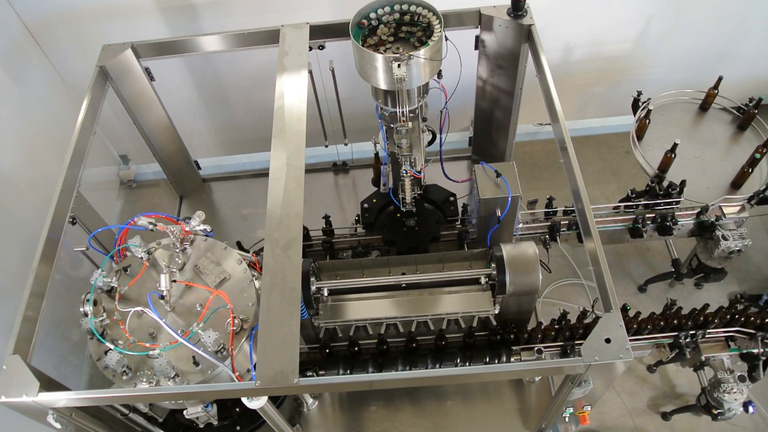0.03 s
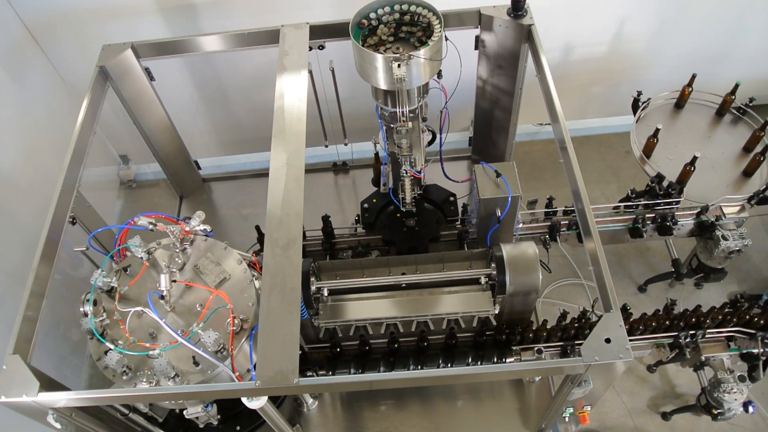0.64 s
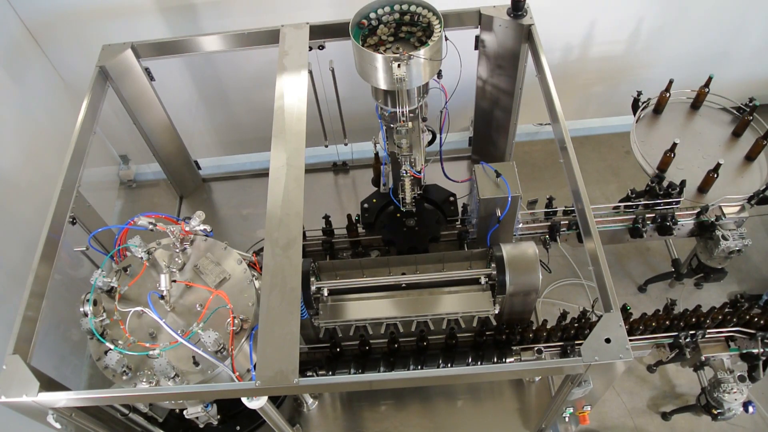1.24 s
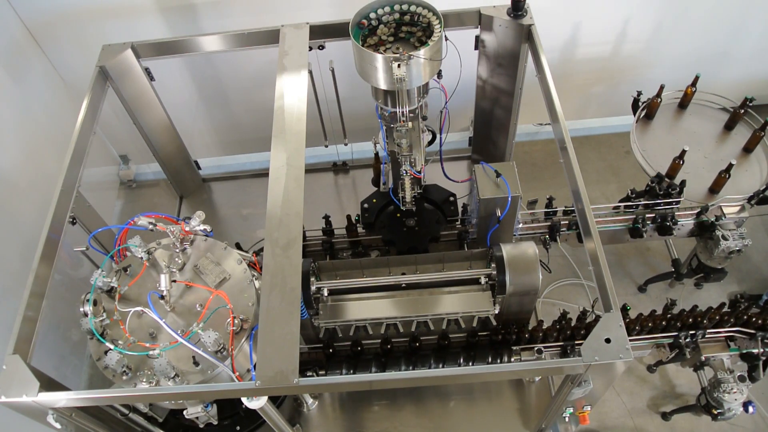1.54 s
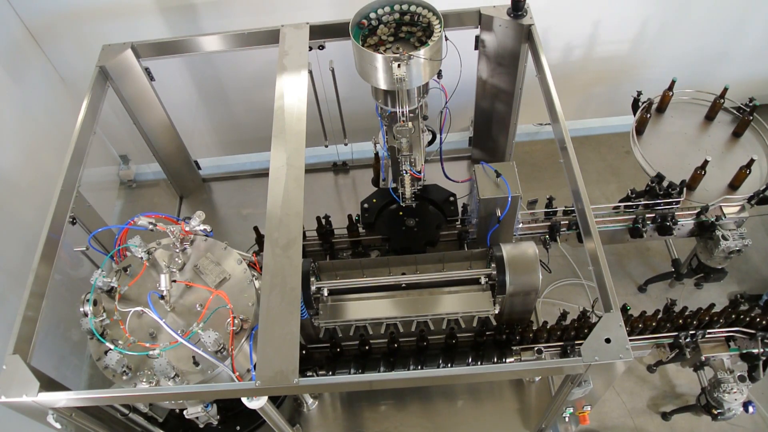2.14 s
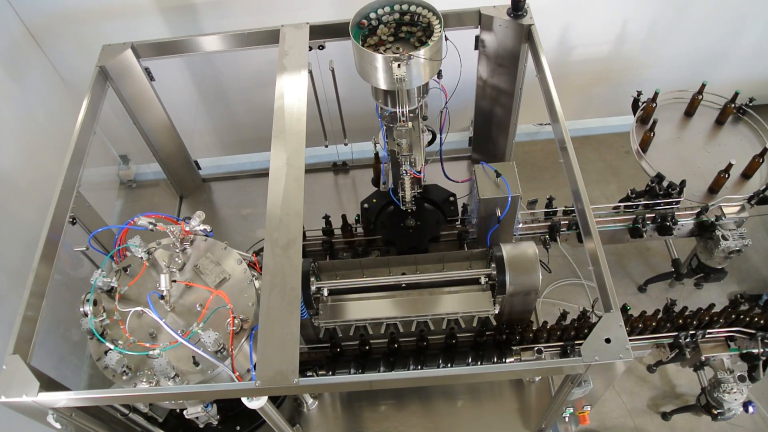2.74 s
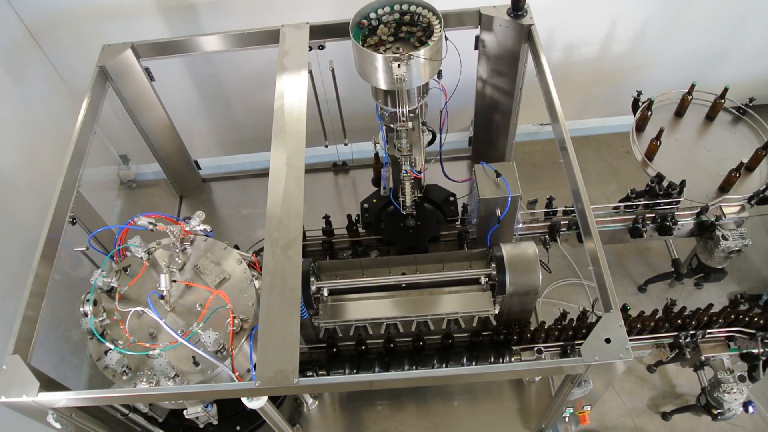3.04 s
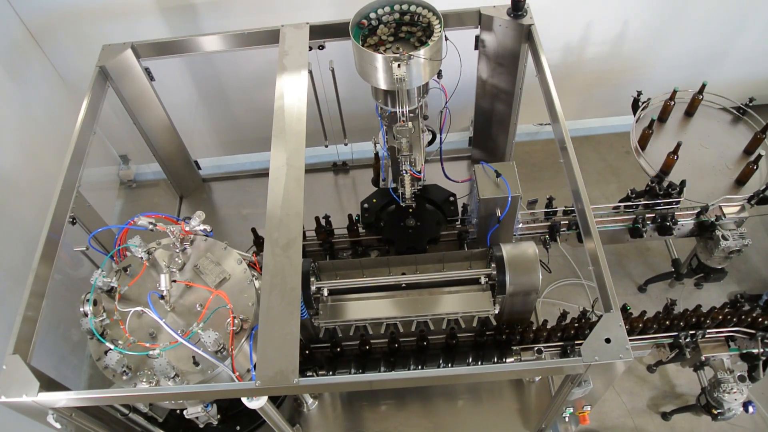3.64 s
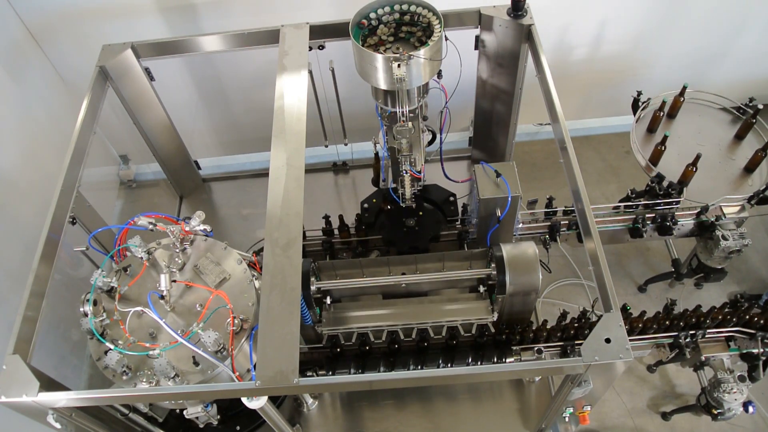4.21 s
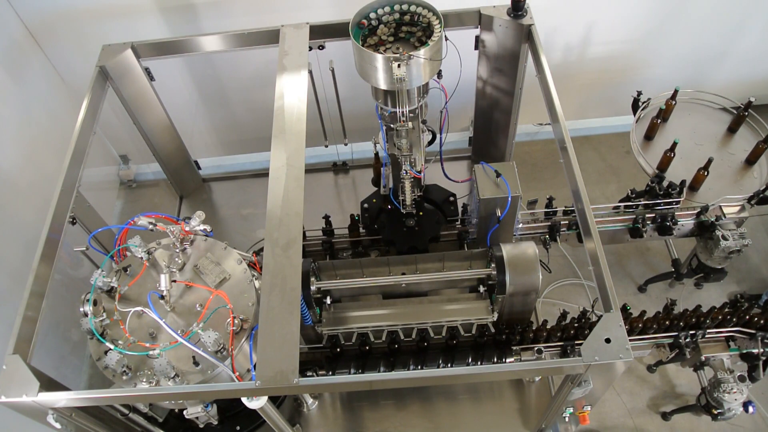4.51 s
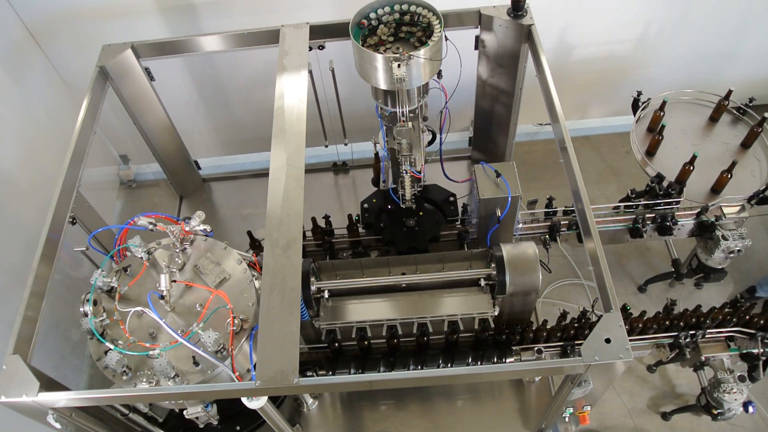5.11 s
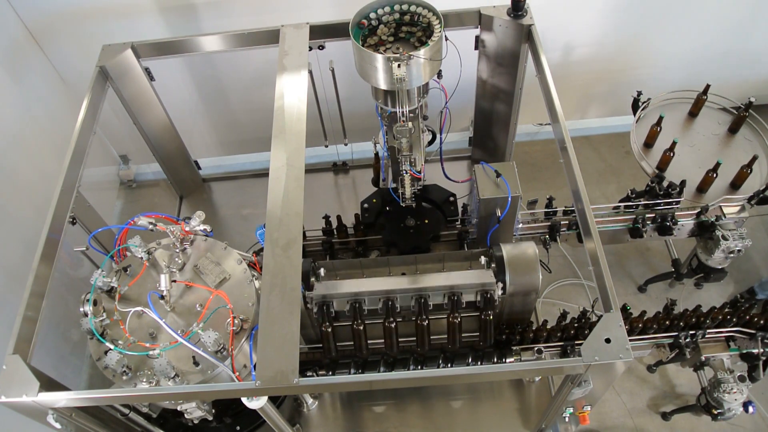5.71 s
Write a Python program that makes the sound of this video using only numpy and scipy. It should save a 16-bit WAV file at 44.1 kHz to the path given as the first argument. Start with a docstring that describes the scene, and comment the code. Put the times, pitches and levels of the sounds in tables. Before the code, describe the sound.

In a small, hard-walled factory room, a bottling line runs mostly to the right of the microphone. Its gears and chain drone and whirr, swelling now and then, while crowded glass bottles chatter against each other. Air cylinders let out two sharp blasts, well apart. Then ticks and short metallic pings gather, the steel frame knocks, water jets hiss, and a third air blast follows near the end.

```python
"""Empty glass bottles jostle and clink on a conveyor, over the roar, whirr and hum of its drive.
Valves tick, single notes ring out, the carousel scrapes its guide and knocks sound the steel frame.
Air cylinders vent three times and rinser jets open late on; a gain control ducks under the hiss.
The bottling line sits mostly on the right, in a small factory room with hard walls."""
import sys
import numpy as np
from scipy import signal
from scipy.fft import rfft, irfft
from scipy.io import wavfile
from scipy.ndimage import uniform_filter1d

SR = 44100
rng = np.random.default_rng(int(sys.argv[2]) if len(sys.argv) > 2 else 0)


def wav_out(sig):
    """Save sig, one row per channel (or a flat mono array), as 16-bit PCM at SR to the path in sys.argv[1]."""
    wavfile.write(sys.argv[1], SR, np.round(np.clip(np.atleast_2d(sig).T, -1, 1) * 32767).astype(np.int16))


N = 262836
TIME = np.arange(N) / SR
BINS = np.fft.rfftfreq(N, 1 / SR)

# Bottle wall modes (one low ring, two high, then the top): pitch_hz, level_db, t60_s, pitch_spread_share
GLASS_MODES = [(2667, 0, 0.11, .015), (3015, 0, 0.071, 0.026), (4452, -12.5, 0.057, 0.015),
               (4590, -1.5, 0.072, 0.0252), (6207, -1.5, 0.038, 0.019), (6495, -0.5, 0.059, 0.0074),
               (7385, -3.5, 0.089, 0.011), (7844, -1.5, 0.047, 0.018), (9795, -3.5, 0.041, 0.0067),
               (11280, -11, 0.053, 0.014), (11970, -5, 0.019, 0.053), (14370, -6, .012, .035)]
# The queue pressing together: start_s, end_s, level_db, high_over_low_db, hardness_db
QUEUE_PRESSES = [(0.0, 0.39, -45.5, 8, -9), (0.51, 0.754, -46.5, 3, -15.5), (0.93, 1.2, -47, -5, -16),
                 (1.245, 1.47, -50.5, -1, -3), (1.473, 2.096, -43.5, 2, -10.5), (2.15, 2.376, -53, 3, -7.5),
                 (2.622, 2.75, -47.5, -3.5, -10.5), (2.988, 3.302, -44.5, -0.5, -8),
                 (3.445, 3.82, -44.5, 3.5, -11.5), (4.63, 4.883, -60.5, 10, 2),
                 (5.006, 5.222, -51.5, -1, -7), (5.416, 5.56, -45, 10, -9)]
# Bottles shoved hard together: middle_s, length_s, ring_db, high_over_low_db, contact_db
SHOVES = [(-0.001, 0.057, -38, 0, -49.5), (0.096, 0.059, -39, 1, -51.5), (0.233, 0.064, -39, -0.5, -55.5),
          (0.331, 0.036, -40.5, 3, -46.5), (.44, 0.033, -42, 16, -53), (0.588, 0.034, -39, 3, -47.5),
          (0.665, .018, -47, 5, -47.5), (0.727, .019, -64, 0, -50.5), (1.2, .025, -39, -12, -63),
          (1.438, 0.065, -39.5, -1.5, -51.5), (1.577, .045, -39.5, 5, -47.5), (1.63, 0.05, -40.5, -17, -53),
          (1.676, 0.036, -39, 22, -46), (1.77, 0.069, -44.5, 10, -85), (1.901, 0.037, -40.5, -9, -52),
          (2.03, 0.032, -43, 7, -50), (2.306, 0.074, -38.5, 7, -51), (3.013, 0.014, -43, -5, -63),
          (3.063, 0.053, -40, -15, -56), (3.171, 0.039, -42, 3, -49), (3.293, 0.1, -40.5, 15, -53.5),
          (3.588, 0.063, -45, 0, -49), (3.68, 0.061, -45, -9, -57), (3.887, .035, -36.5, 8, -52.5),
          (3.981, 0.054, -39, 4.5, -50.5), (4.755, 0.025, -47, -7, -66), (4.879, .025, -42.5, -2, -55),
          (4.982, 0.02, -42, 5, -51.5), (5.07, 0.023, -50, -2, -55), (5.141, 0.012, -35, 1.5, -50),
          (5.159, 0.018, -51, 8, -43), (5.948, 0.035, -54, 17, -68)]
# Dry rub of glass on glass: frequency_hz, level_db
RUB_SPECTRUM = [(1000, -43), (3500, -19), (5500, 0), (7500, 3), (9000, -2), (12000, 2), (16000, -26)]
# Roar of the gears: frequency_hz, level_db
GEAR_SPECTRUM = [(20, -60), (35, -50), (52, -44), (72, -22), (120, -19.5), (150, -12), (200, -15.5),
                 (260, -5.5), (480, -4), (700, 0), (960, -0.5), (1200, -8.5), (2400, -33), (8000, -41)]
# Whirr of the chain: frequency_hz, level_db
CHAIN_SPECTRUM = [(20, -70), (100, -46), (300, -20), (900, -5), (1300, 2.5), (2350, 3.5), (3300, 0),
                  (3900, -4.5), (5000, -2), (8000, -16.5), (9000, -10.5), (13000, -18.5), (16000, -30)]
# Panel resonances that colour gears and chain: centre_hz, width_hz, lift_db
PANEL_PEAKS = [(487, 73, 5.5), (582, 3.6, 6.5), (940, 25, 1), (1020, 9.2, 3.5), (1529, 7.3, 10),
               (1983, 20, 5), (2480, 30, -4)]
# Motor hum: pitch_hz, level_db
HUM_TONES = [(100, -1.5), (75, -14.5), (150.3, -13.5)]
# Thin whine of the drive: pitch_hz, level_db
WHINE_TONES = [(7945, -76), (8150, -71), (11800, -78)]
# Strokes that load the drive: start_s, end_s, roar_lift_db, hum_lift_db
LOAD_STROKES = [(0.213, .3, 1.5, -1), (1.145, 1.517, 5.5, 7), (2.205, 2.38, 1.5, 1.5),
                (2.93, 3.183, 3, 0.5), (3.75, 3.98, 0.5, 1.5), (4.744, 5.156, 6, 2.5), (5.4, 5.547, 7, 7)]
# The chain running slack: start_s, end_s, change_db
SLACK_SPELLS = [(0, .02, -3), (.44, 0.658, -1), (2.77, 2.936, -3), (3.37, 3.422, -3), (4.35, 4.484, -7.5),
                (5.246, 5.373, 0), (5.75, 5.96, -4.5)]
# Valve ticks and sharp taps: start_s, level_db, t60_s
VALVE_TICKS = [(.782, -46.5, 0.06), (0.952, -52, 0.08), (1.123, -49, 0.1), (1.296, -47, 0.11),
               (2.320, -51, 0.064), (3.003, -51.5, 0.069), (3.858, -47, 0.066), (4.378, -56, .08),
               (4.541, -46.5, 0.13), (4.619, -55, 0.1), (4.882, -52, 0.099), (5.052, -51, 0.14),
               (5.120, -50, 0.11)]
# Colour of a tick: frequency_hz, level_db
TICK_SPECTRUM = [(800, -35), (3500, -1.5), (4700, 2), (5250, 8.5), (5900, -5), (8000, -0.5), (12500, -4),
                 (16000, -11)]
# Short rings, and one faint, thin, high tone that fades slowly: start_s, pitch_hz, level_db, t60_s
RINGING_NOTES = [(1.03, 1003, -50, 0.6), (1.25, 10700, -61, 3.9), (3.57, 4030, -48, 0.52),
                 (3.595, 3620, -46, 0.36), (4.541, 5110, -54, 0.053), (4.62, 4800, -48, 0.11),
                 (4.705, 4900, -47, 0.13), (4.795, 4900, -51, 0.14), (4.885, 3420, -41, 0.07),
                 (5.055, 3470, -41, 0.06), (5.12, 4800, -45, 0.059), (5.146, 10300, -42, 0.12),
                 (5.15, 3680, -42, 0.24), (5.455, 4960, -30, 0.067), (5.64, 3720, -48, 0.21)]
# The carousel touching its guide: middle_s, length_s, peak_pitch_hz, level_db
GUIDE_SCRAPES = [(1.3, .08, 740, -55), (1.403, .12, 954, -46.5), (2.981, .12, 840, -50.5),
                 (3.16, .1, 739, -54.5), (4.93, 0.17, 732, -55), (5.118, .11, 860, -51.5)]
# Dull knocks on the frame: start_s, level_db, pitch_ratio
FRAME_KNOCKS = [(1.372, -69, 1.3), (2.976, -53, 0.96), (4.813, -39, 1.0)]
# Modes of the steel frame: pitch_hz, level_db, t60_s
FRAME_MODES = [(462, 5.5, 0.1), (780, -6, .2), (834, -20, .15), (996, -10, 0.13), (1610, -7, 0.23),
               (1960, -22, 0.28)]
# Cylinders venting: start_s, end_s, level_db
VENT_BLASTS = [(2.366, 2.536, -28.5), (3.991, 4.15, -28.5), (5.604, 5.763, -30.5)]
# Hiss of the exhaust air: frequency_hz, level_db
VENT_SPECTRUM = [(400, -48), (1400, -21), (2300, -5.5), (5000, -2.5), (6200, -3), (6900, 1.5), (8200, -1.5),
                 (9800, 1), (11200, 2.5), (13000, 2.5), (14200, -0.5), (16000, -1)]
# Rinser jets: start_s, full_flow_end_s, level_db
JET_BURSTS = [(4.533, 4.73, -51), (5.171, 5.5, -33.5)]
# Hiss of the spray: frequency_hz, level_db
JET_SPECTRUM = [(600, -12.5), (2000, -10), (5000, -5), (8000, -3), (10000, 1.5), (12000, 3), (16000, 1.5)]
# Decay of the room: frequency_hz, t60_s
ROOM_DECAY = [(200, 0.24), (2500, 1), (7000, 0.8), (11000, 0.47), (16000, 0.5)]
# How alike left and right sound: frequency_hz, likeness_ratio (held to 0..1 in the mix)
STEREO_LIKENESS = [(60, 1.4), (640, 0.5), (1400, .8), (3100, 0.17), (6800, 0.01), (15000, -0.17)]
# The weaker left side: frequency_hz, left_over_right_db
LEFT_BALANCE = [(100, -13.5), (400, -13.5), (1300, -14), (2700, -15), (4400, -14), (8100, -13.5),
                (12000, -14.5), (15000, -24)]


def bottles(high_db=-1.5, top_db=1.5, rub_db=-2.5):
    """Glass rings swell as the bottles crowd; hard contacts rub and wake the top modes."""
    low, high, top = glass_rings()
    low_power, high_power, top_power, contact_power = jostle()
    glass = np.sqrt(low_power) * stray(low) + amp(high_db) * np.sqrt(high_power) * stray(high)
    glass += np.sqrt(amp(2 * top_db) * top_power + contact_power) * top
    return glass + np.sqrt(contact_power) * amp(rub_db) * noise(curve(RUB_SPECTRUM, BINS))


def glass_rings(count=14, taps_per_s=550, spread_db=1.0, clump_db=3.5, swell_db=1.1):
    """Bottles of slightly different size tap in clumps, making beds of low, high and top modes."""
    t = np.arange(5000) / SR
    hz, db, t60, spread = np.transpose(GLASS_MODES)[:, :, None]
    clumps = amp(clump_db * wander(16))
    rings = np.zeros((3, 2, N))
    for size in np.linspace(-1, 1, count):
        at = rng.integers(0, N, round(taps_per_s * N / SR / count))
        force = clumps[at] * amp(spread_db * np.minimum(rng.exponential(1, len(at)), 4))
        taps = force * rng.choice([-1, 1], len(at))
        pitch = hz * (1 + spread * (size + rng.standard_normal(hz.shape) / count))
        phase = 2 * np.pi * (pitch * t + rng.random((2, len(hz), 1)))
        modes = amp(db - 60 * t / t60) / np.sqrt(t60) * np.sin(phase)
        groups = np.array([modes[:, 0], modes[:, 1:3].sum(1), modes[:, 3:].sum(1)])
        for start, tap in zip(TIME[at], taps):
            add(rings, start, tap * groups)
    slow_level = np.sqrt(abs(uniform_filter1d(rings ** 2, 1500)) + 1e-12)
    swell = amp(swell_db * np.array([[wander(20)] for _ in rings]))
    return rings / slow_level * swell  # evened out, with the fast grain kept


def jostle(idle_db=(-58, -59, -66.5), slack_share=0.8, pack_s=0.015, loosen_s=0.041):
    """Power of low, high and top modes and of hard contacts as bottles ride loose, press and shove."""
    riding_db, contact = slack_share * chain_slack(), 0
    low, high, top = (amp(2 * (db + riding_db)) for db in idle_db)
    for start, end, db, tilt_db, hardness_db in QUEUE_PRESSES:
        power, tilt = amp(2 * db) * spell(start, end, pack_s, loosen_s), amp(2 * tilt_db)
        low += power / (1 + tilt)
        high += power * tilt / (1 + tilt)
        top += power * amp(2 * hardness_db)
    for middle, length, db, tilt_db, contact_db in SHOVES:
        shove, tilt = bump(middle, length), amp(2 * tilt_db)
        power = amp(2 * db) / (1 + tilt) * shove
        low += power
        high += power * tilt
        contact += amp(2 * contact_db) * shove
    return low, high, top, contact


def stray(ring, pitch_share=0.008, rate_hz=18.04):
    """The ring drifts in pitch as other bottles take the knocks."""
    warped = TIME + np.cumsum(pitch_share * wander(rate_hz)) / SR
    return np.array([np.interp(warped % TIME[-1], TIME, channel) for channel in ring])


def drive(gear_db=-55, chain_db=-50, hum_db=-77, load_s=0.12, relief_s=0.11, lead_s=0.14):
    """Gears roar and the chain whirrs through panels, swelling with each stroke; the motor hums."""
    load_db = strain_db = 0
    for start, end, roar_lift, hum_lift in LOAD_STROKES:
        load_db += roar_lift * spell(start, end, load_s, relief_s)
        strain_db += hum_lift * spell(start - lead_s, end - lead_s, load_s, relief_s)  # motor goes first
    slack_db, flutter_db = chain_slack(), 1.24 * wander(16)
    panels_db = sum(lift / (1 + (2 * (BINS - hz) / width) ** 2) for hz, width, lift in PANEL_PEAKS)
    roar = noise(curve(GEAR_SPECTRUM, BINS) + panels_db)
    roar *= amp(gear_db + load_db + 0.32 * slack_db + flutter_db)
    whirr = noise(curve(CHAIN_SPECTRUM, BINS) + panels_db)
    grit_db = 0.5 * wander(67)
    whirr *= amp(chain_db + 0.39 * load_db + slack_db + flutter_db + grit_db)
    hum = motor_tones(HUM_TONES, waver_hz=3.8) * amp(hum_db + strain_db)
    whine = motor_tones(WHINE_TONES, waver_hz=9.3)
    return roar + whirr + (hum + whine) * [[1], [0]]  # near layer only


def chain_slack(ease_s=0.054):
    """The dip in dB as the chain goes slack and tightens again."""
    return sum(db * spell(start, end, ease_s, ease_s) for start, end, db in SLACK_SPELLS)


def motor_tones(tones, waver_hz):
    """A few sines that waver in pitch."""
    return sum(amp(db) * np.sqrt(2) * np.sin(2 * np.pi * np.cumsum(hz + waver_hz * wander(16.8)) / SR)
               for hz, db in tones)


def valve_ticks(crack_db=3.5, crack_s=0.029, rise_s=0.00027):
    """Each valve gives a bright crack and a short noisy rattle."""
    envelope, t = np.zeros(N), np.arange(SR) / SR
    crack = (1 + amp(crack_db) * np.exp(-t / crack_s)) * rise(t, rise_s)
    for start, db, t60 in VALVE_TICKS:
        add(envelope, start, amp(db - 60 * t / t60) * crack)
    return envelope * noise(curve(TICK_SPECTRUM, BINS))


def ringing_notes(chatter_rad=0.61, rise_s=0.00027):
    """Loose parts chatter as they ring briefly; apart from them, a faint, thin, high tone fades slowly."""
    out, t = np.zeros((2, N)), np.arange(SR) / SR
    chatter = chatter_rad * wander(110)
    for start, hz, db, t60 in RINGING_NOTES:
        phase = 2 * np.pi * (hz * t + rng.random((2, 1))) + np.interp(start + t, TIME, chatter)
        add(out, start, amp(db - 60 * t / t60) * np.sin(phase) * rise(t, rise_s))
    return out


def carousel_scrape(width_hz=240.0, droop_share=0.3):
    """Hollow friction noise in one broad resonance that rises and falls with the contact pressure."""
    a, b = noise(-10 * np.log10(1 + (2 * BINS / width_hz) ** 4))
    band = np.zeros(N, complex)
    for middle, length, peak_hz, db in GUIDE_SCRAPES:
        pressure = bump(middle, length)
        hz = peak_hz * (1 - droop_share * (1 - pressure))
        band += amp(db) * np.sqrt(pressure) * (a + 1j * b) * np.exp(2j * np.pi * np.cumsum(hz) / SR)
    return np.array([band.real, band.imag])


def frame_knocks(rise_s=0.0011):
    """Dull knocks briefly ring the modes of the steel frame."""
    out, t = np.zeros((2, N)), np.arange(SR) / SR
    for start, level_db, ratio in FRAME_KNOCKS:
        ring = sum(amp(db - 60 * t / t60) * np.sin(2 * np.pi * (hz * ratio * t + rng.random((2, 1))))
                   for hz, db, t60 in FRAME_MODES)
        add(out, start, amp(level_db) * ring * rise(t, rise_s))
    return out


def cylinder_vents(surge_db=7.5, surge_s=0.04, open_s=0.018, close_s=0.012):
    """Each vent opens with a surge of air, blows and shuts."""
    flow = np.zeros(N)
    for start, end, db in VENT_BLASTS:
        gate = rise(since(start), open_s) ** 2 * np.exp(-since(end) / close_s)
        flow += amp(db + surge_db * np.exp(-since(start) / surge_s)) * gate
    return flow * noise(curve(VENT_SPECTRUM, BINS))


def rinser_jets(open_s=0.0044, ease_s=0.039, trail_db=-9, sag_db_per_s=3.5):
    """Jets snap open, then ease to a weaker trailing hiss; the pressure sags throughout."""
    flow = np.zeros(N)
    for start, end, db in JET_BURSTS:
        age, eased = since(start), rise(since(end), ease_s)
        flow += amp(db - sag_db_per_s * age + trail_db * eased) * rise(age, open_s)
    return flow * noise(curve(JET_SPECTRUM, BINS))


def in_room(sound, wet_db):
    """Adds the diffuse tail of the hard walls, which lingers longest in the upper mids."""
    tail = rng.standard_normal((2, SR)) * (rng.random((2, SR)) < .1)
    tail[:, :round(.006 * SR)] = 0  # pre-delay
    hz, t, bands = signal.stft(tail, SR, nperseg=256)
    tail = signal.istft(bands * amp(-60 * t / curve(ROOM_DECAY, hz)[:, None]), SR, nperseg=256)[1]
    return sound + amp(wet_db) * signal.fftconvolve(sound, tail / np.linalg.norm(tail[0]), axes=1)[:, :N]


def treble_comb(sound, count=14, tap_db=-20.5, reach_s=0.014):
    """A short random comb gives the treble a faint, fixed, ringing colour."""
    taps = np.zeros((2, SR // 20))
    at = (SR * reach_s * rng.uniform(.1, 1, (2, count))).astype(int)
    np.put_along_axis(taps, at, amp(tap_db) * rng.choice([-1, 1], at.shape), 1)
    taps = signal.sosfilt(signal.butter(2, 3500, "high", fs=SR, output="sos"), taps)
    return sound + signal.oaconvolve(sound, taps, axes=1)[:, :N]


def amp(db):
    """Decibels to gain."""
    return 10 ** (np.asarray(db) / 20)


def unit(x):
    """Scales to rms 1."""
    return x / np.sqrt(np.mean(x ** 2) + 1e-20)


def curve(points, hz):
    """Reads a table on a log-frequency axis."""
    table_hz, value = np.transpose(points)
    return np.interp(np.log(hz + 1), np.log(table_hz + 1), value)


def add(mix, start_s, sound):
    """Drops a sound into the mix."""
    part = mix[..., max(round(start_s * SR), 0):][..., :sound.shape[-1]]
    part += sound[..., :part.shape[-1]]


def noise(spectrum_db):
    """Two unrelated layers of coloured noise."""
    a, b = rng.standard_normal((2, 2, len(BINS)))
    return unit(irfft((a + 1j * b) * amp(spectrum_db), N))


def wander(rate_hz, size=8192):
    """Smooth random movement of rms 1."""
    t = np.linspace(0, N / SR, size)
    rolloff = 1 + (np.fft.rfftfreq(size, t[1]) / rate_hz) ** 4
    return np.interp(TIME, t, unit(irfft(rfft(rng.standard_normal(size)) / rolloff, size)))


def since(start_s):
    """Seconds since a cue, zero before it."""
    return np.maximum(TIME - start_s, 0)


def rise(age, rise_s):
    """An attack that eases from 0 to 1."""
    return 1 - np.exp(-age / rise_s)


def spell(start, end, rise_s, fall_s):
    """An envelope that swells up to start, holds at 1 until end, and dies away."""
    return np.exp(-np.maximum(start - TIME, 0) / rise_s - since(end) / fall_s)


def bump(middle, length):
    """A bell-shaped envelope of height 1."""
    offset = (TIME - middle) / length
    return np.exp(-(2 * offset) ** 2) * (abs(offset) < 2)


def scene(right_db=3.5, air_leftward_db=2.5):
    """The near layer plays on the right; the far weaker left shares its bass but not its treble."""
    line = in_room(bottles(), wet_db=-8) + drive() + carousel_scrape()
    air = in_room(cylinder_vents() + rinser_jets(), wet_db=-8) * amp([[0], [air_leftward_db]])
    hits = in_room(valve_ticks() + ringing_notes() + frame_knocks(), wet_db=-9)
    near, other = rfft(treble_comb(line + air + hits))
    likeness = np.clip(curve(STEREO_LIKENESS, BINS), 0, 1)
    left = (likeness * near + np.sqrt(1 - likeness ** 2) * other) * amp(curve(LEFT_BALANCE, BINS))
    return amp(right_db) * irfft(np.array([left, near]), N)


def record(dry, threshold_db=-37.0, slope=0.9, recovery_db_per_s=39.0, attack_s=0.013, edge_hz=15850):
    """Gain control, keyed by treble on the right, ducks fast and recovers slowly; then a high cut."""
    treble = signal.sosfilt(signal.butter(2, 8000, "high", fs=SR, output="sos"), dry[1])
    power_db = 10 * np.log10(abs(uniform_filter1d(treble ** 2, size=400)) + 1e-12)
    cut_db = slope * np.maximum(power_db - threshold_db, 0)
    held_db = np.maximum.accumulate(cut_db + recovery_db_per_s * TIME) - recovery_db_per_s * TIME
    pole = np.exp(-1 / (attack_s * SR))
    ducked = dry * amp(-signal.lfilter([1 - pole], [1, -pole], held_db))
    high_cut = signal.firwin(611, edge_hz, window=("kaiser", 7), fs=SR)
    return signal.oaconvolve(ducked, high_cut[None], "same")


dry = scene()
out = record(dry)
wav_out(out)
```